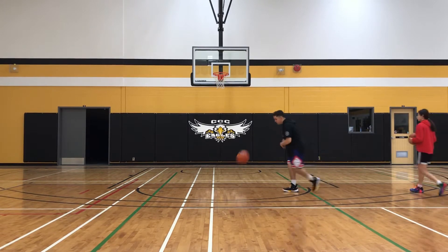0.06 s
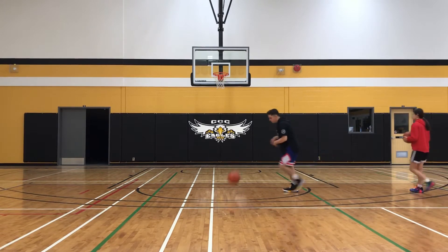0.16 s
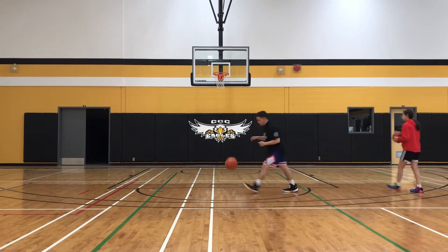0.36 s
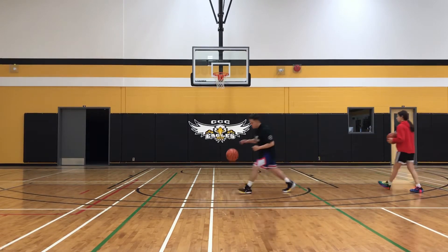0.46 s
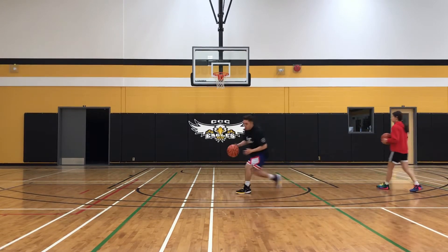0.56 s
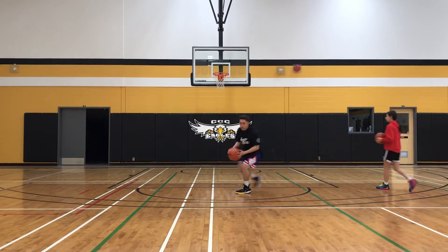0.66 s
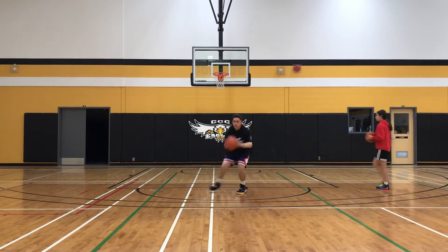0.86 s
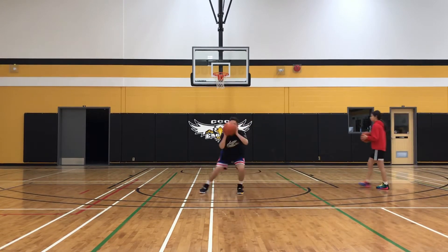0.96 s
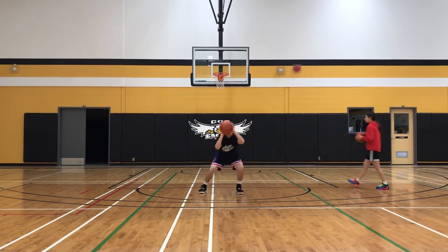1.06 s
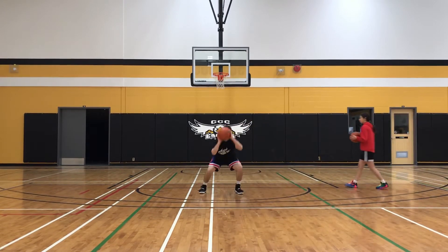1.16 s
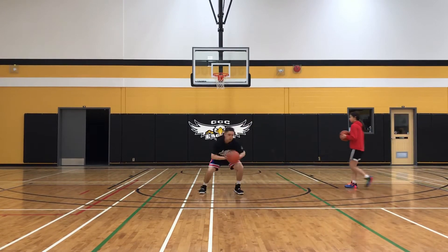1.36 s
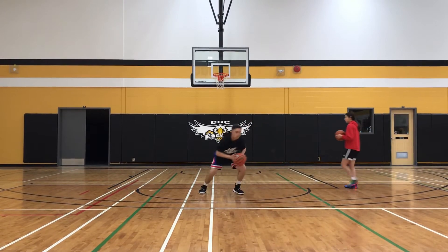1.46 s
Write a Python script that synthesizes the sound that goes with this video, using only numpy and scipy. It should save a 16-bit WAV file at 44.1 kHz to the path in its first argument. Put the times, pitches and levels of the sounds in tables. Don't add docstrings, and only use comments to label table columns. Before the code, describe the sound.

In a large reverberant gym, a basketball hits the wooden floor once, sharp and boomy. Echoes flutter back and fade slowly over quiet air rumble, with barely audible sole scuffs, heard from across the court.

```python
import sys
import numpy as np
from scipy import signal
from scipy.fft import rfft, irfft
from scipy.io import wavfile
from scipy.ndimage import uniform_filter1d

SR = 44100
rng = np.random.default_rng(int(sys.argv[2]) if len(sys.argv) > 2 else 0)


def volts_from_db(level):
    exponent = np.asarray(level, float) / 20
    return 10 ** exponent


def unload_wav(signal):
    wavfile.write(
        sys.argv[1],
        SR,
        np.round(np.clip(np.atleast_2d(signal).T, -1, 1) * 32767).astype(np.int16),
    )


N = 66150
BOUNCE_S = .21905


def evened(x):
    return x / np.sqrt(np.mean(x ** 2) + 1e-20)


def read(points, hz):
    f, value = np.transpose(points)
    return np.interp(np.log(hz + 1), np.log(f + 1), value)


def add(mix, start_s, sound):
    part = mix[round(start_s * SR):][:len(sound)]
    part += sound[:len(part)]


def band(x, lo_hz, hi_hz):
    edges = np.clip([lo_hz, hi_hz], 20, SR / 2.1)
    return signal.sosfilt(signal.butter(2, edges, "band", fs=SR, output="sos"), x)


def fading(t, level_db, t60_s):
    return volts_from_db(level_db - 60 * t / t60_s)


def wash(colour, size, t60=None, patchy_db=1.):
    hop = size // 4
    frames, hz = N // hop + 5, np.fft.rfftfreq(size, 1 / SR)
    real, imaginary, patches = rng.standard_normal((frames, len(hz), 3)).T
    patches = uniform_filter1d(uniform_filter1d(patches, size=9, axis=0), size=9, axis=1)
    colour_db = read(colour, hz)
    db = colour_db[:, None] + patchy_db * evened(patches)
    if t60:
        age_s = np.maximum(np.arange(frames) * hop / SR - BOUNCE_S, 0)
        db = db - 60 * age_s / read(t60, hz)[:, None]
    spectra = (real + 1j * imaginary) * volts_from_db(db)
    norm = np.sqrt(np.sum(volts_from_db(2 * colour_db)) * 16 / 3)
    return signal.istft(spectra, nperseg=size, noverlap=size - hop)[1][:N] / norm * 2


# pitch_hz [Hz], level_db [dB per Hz]
SLAP_COLOUR = [(300, -8), (1250, 10.5), (2300, 0), (3700, 1.5), (4400, -8), (9900, -11), (14400, -9.5),
               (16500, -15)]


def slap():
    hz = abs(np.fft.fftfreq(2048, 1 / SR))
    log_gain = np.log(volts_from_db(np.maximum(read(SLAP_COLOUR, hz), -100)))
    click = np.fft.ifft(np.exp(log_gain - 1j * signal.hilbert(log_gain).imag)).real[:1500]
    return -volts_from_db(-14) * np.pad(click, (0, 3500)) / abs(click).max()


# pitch_hz [Hz], level_db [dB], t60_s [s]
RING_TONES = [
    (1093, -6.5, 0.028),
    (1676, 1, 0.0096),
    (2670, -21, 0.032),
    (548, -16, 0.11),
    (429, -8, 0.17),
    (728, -19.5, 0.11),
    (250, -3, 0.2),
    (3820, -31, 0.021),
]


def ball_ring():
    t, rise_cycles = np.arange(5000) / SR, 1.2
    ring = np.zeros(len(t))
    for hz, db, t60_s in RING_TONES:
        rise = np.minimum(hz * t / rise_cycles, 1)
        ring += fading(t, db, t60_s) * rise * np.sin(2 * np.pi * hz * t)
    return volts_from_db(-26.5) * ring


def nearby_scatter():
    out = np.zeros(2000)
    t = np.arange(600) / SR
    sizzle = band(rng.standard_normal(len(t)), 1600, 23000)
    add(out, 0, (t < .0135) * fading(t, -49.5, .07) * sizzle)
    rattle = band(rng.standard_normal(len(out)), 600, 1500)
    return out + fading(np.arange(len(out)) / SR, -37, .11) * rattle


# delay_s [s], low_edge_hz [Hz], high_edge_hz [Hz], scatter [0-1]
ECHOES = [
    (.0037, 2000, 7500, .5),
    (.0119, 2200, 4600, .15),
    (.016, 2500, 4800, .6),
    (.0262, 1500, 15000, .9),
    (.0371, 1200, 11000, .2),
    (.0464, 700, 6000, .4),
    (.060, 600, 4000, .4),
    (.0662, 1500, 12000, .8),
]
ECHO_DB = [-34, -9, -24, -30, -11.5, -14.5, -17.5, -20.5]


def bounce():
    out, t = np.zeros(N), np.arange(600) / SR
    hit = slap() + ball_ring()
    add(out, BOUNCE_S, hit)
    add(out, BOUNCE_S, nearby_scatter())
    for (delay_s, lo_hz, hi_hz, scatter), db in zip(ECHOES, ECHO_DB):
        wall = (t == 0) + scatter * 0.51 * rng.standard_normal(len(t)) * fading(t, 0, .007)
        add(out, BOUNCE_S + delay_s, volts_from_db(db) * band(np.convolve(hit, wall), lo_hz, hi_hz))
    return out


# start_s [s], level_db [dB], pitch_hz [Hz], length [cycles]
THUD_RETURNS = [(0.253, -20.5, 119.5, 2.6), (0.2732, -24.5, 115.4, 5), (0.323, -23.5, 89, 2.55),
                (0.345, -26.5, 125, 2.7), (0.377, -52, 113, 2.7), (0.406, -24, 111, 3.5),
                (0.467, -29, 123, 3.6), (0.496, -31, 102.7, 7.8), (0.548, -29, 81, 3.3),
                (0.589, -30.5, 88, 3.2), (0.62, -26, 122.4, 4.8), (0.683, -31, 78, 1.84),
                (0.747, -33, 72.3, 5.3), (0.859, -32, 100.2, 4.25), (.945, -39.5, 95, 3.9),
                (1.062, -39.5, 73, 2.1), (1.127, -39, 75, 3.5)]


def thuds():
    length_s, squeeze_s = .03, .003
    out, t = np.zeros(N), np.arange(0, length_s, 1 / SR)
    turns = 110 * t + 147 * squeeze_s * (1 - np.exp(-t / squeeze_s))
    arch = np.sin(np.pi * t / length_s)
    first_push = .9 * np.minimum(t / 0.0012, 1) * np.exp(-t / .003)
    add(out, BOUNCE_S + .001, volts_from_db(-17.5) * (arch + first_push) * np.sin(2 * np.pi * turns))
    for start_s, db, hz, cycles in THUD_RETURNS:
        u = np.arange(0, 1, hz / cycles / SR)
        swell = np.sin(np.pi * u ** 0.58) ** 1.25
        add(out, start_s, volts_from_db(db) * swell * np.sin(2 * np.pi * cycles * u))
    return out


# pitch_hz [Hz], level_db [dB per Hz]
TAIL_COLOUR = [(420, -10.5), (830, -20.5), (1250, -10), (3850, -25), (4300, -29.5), (6700, -38),
               (7900, -57), (15500, -41)]
# pitch_hz [Hz], level_db [dB per Hz]
BOOM_COLOUR = [(18, -54), (30, -24), (63, -5), (114, 1), (135, -2), (200, -15), (355, -28), (400, -27),
               (520, -57), (880, -120)]
# pitch_hz [Hz], level_db [dB per Hz]
BOARDS_COLOUR = [(120, -20), (150, 4.5), (200, 0), (270, -7.5), (330, -14.5), (430, -8.5), (520, -42.5)]
# pitch_hz [Hz], t60_s [s]
GYM_DECAY = [(60, 3.1), (120, 3.22), (300, 2.4), (1100, 2.32), (2900, 2.64), (6000, 2.63), (10000, .7),
             (15000, .45)]


def gym():
    t = np.arange(N) / SR - BOUNCE_S
    gap_s, rise_s = .0245, 0.067
    build = (t > gap_s) * np.clip(0.55 + (t - gap_s) / rise_s, 0, 1)
    bloom_db = 2 * np.exp(-abs(t) / 0.094)
    tail = wash(TAIL_COLOUR, size=256, t60=GYM_DECAY, patchy_db=1.38)
    boom = volts_from_db(-33) * wash(BOOM_COLOUR, size=2048, t60=GYM_DECAY, patchy_db=0)
    boards = volts_from_db(-34.5) * wash(BOARDS_COLOUR, size=2048, t60=GYM_DECAY, patchy_db=0)
    bass_build = np.clip((t - 0.0083) / 0.054, 0, 1)
    return volts_from_db(-41.5 + bloom_db) * build * tail + bass_build * (boom + boards)


# start_s [s], length_s [s], level_db [dB], low_edge_hz [Hz],
# high_edge_hz [Hz]
SCUFFS = [
    (.0035, 0.0025, -44, 1880, 2670),
    (0.548, 0.23, -80.5, 7089, 16120),
    (0.662, 0.014, -72, 10500, 15800),
    (0.677, 0.0073, -73, 5000, 11000),
    (0.752, 0.21, -79.5, 7000, 15900),
    (.878, 0.00492, -82, 11000, 16000),
    (0.918, .045, -74, 8060, 16500),
    (0.932, .12, -75.5, 6900, 14000),
    (1.108, 0.016, -58.5, 250, 897),
    (1.155, 0.018, -63, 1180, 1420),
]


def scuffs():
    out, size = np.zeros(N), 8000
    for start_s, length_s, db, lo_hz, hi_hz in SCUFFS:
        noise, grain = rng.standard_normal((2, size))
        grit = noise * volts_from_db(4 * evened(uniform_filter1d(grain, size=200)))
        hiss = evened(band(band(grit, lo_hz, hi_hz), lo_hz, hi_hz))
        u = np.minimum(np.arange(size) / SR / length_s, 1)
        add(out, start_s, volts_from_db(db) * np.sin(np.pi * u ** .75) * hiss)
    return out


# pitch_hz [Hz], level_db [dB per Hz]
AIR_COLOUR = [(15, -64), (25, -47), (60, 4), (182, -2), (214, -2), (339, -22.5), (3910, -42.5),
              (15200, -52.5), (16500, -57)]
# time_s [s], level_db [dB]
WHINE_LEVEL = [(0, -75.5), (.6, -69.5), (1.2, -74.5), (1.33, -67), (1.42, -72.5), (1.5, -95)]


def ventilation():
    t = np.arange(N) / SR
    wander = evened(uniform_filter1d(rng.standard_normal(N), size=1500))
    whine_hz = 537 + 3.2 * wander
    whine = np.sqrt(2) * np.sin(2 * np.pi * np.cumsum(whine_hz) / SR)
    whine_db = np.interp(t, *np.transpose(WHINE_LEVEL))
    air = evened(wash(AIR_COLOUR, size=2048, patchy_db=0))
    return volts_from_db(-50.5) * air + volts_from_db(whine_db) * whine


def scene():
    smooth = gym() + scuffs() + ventilation()
    low_pass = signal.firwin(numtaps=255, cutoff=15800, fs=SR)
    smooth = signal.oaconvolve(smooth, low_pass, "same")
    return (bounce() + thuds() + smooth)[None]


def top_cut(x):
    return signal.sosfilt(signal.butter(12, 16650, fs=SR, output="sos"), x)


# pitch_hz [Hz], gain_db [dB]
MIC_COLOUR = [(28, -25), (55, 0.5), (3800, 1), (4300, 0), (6600, 2), (9900, 0), (14300, 0), (15700, 3.5)]


def record(dry):
    gain = volts_from_db(read(MIC_COLOUR, np.fft.rfftfreq(N, 1 / SR)))
    mix = irfft(rfft(dry) * gain, N)
    return top_cut(mix)


dry = scene()
out = record(dry)
unload_wav(out)
```